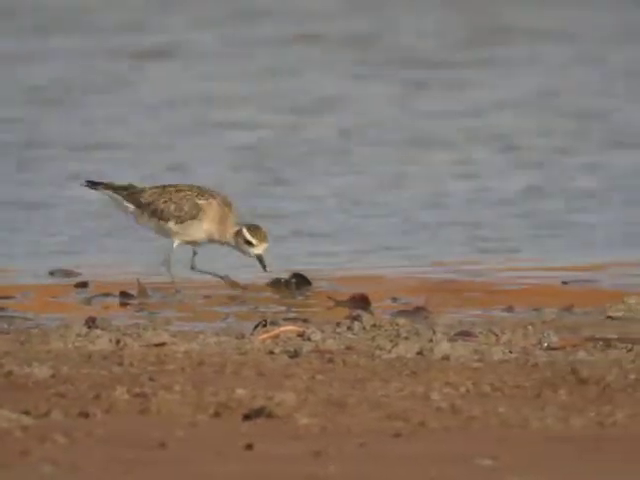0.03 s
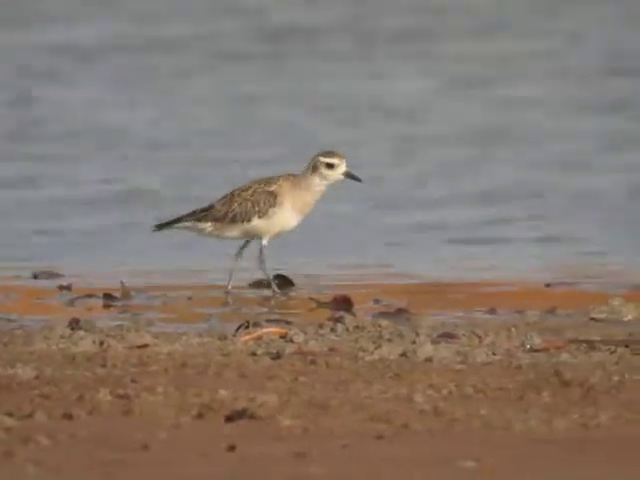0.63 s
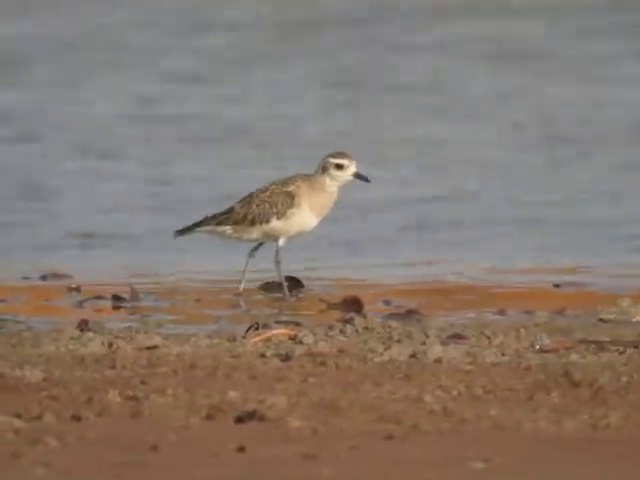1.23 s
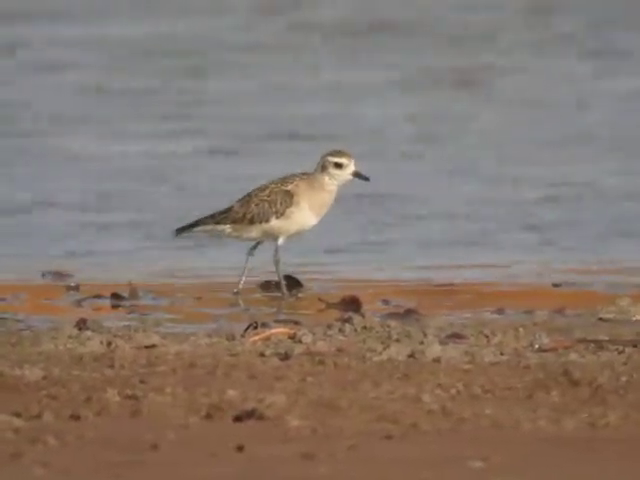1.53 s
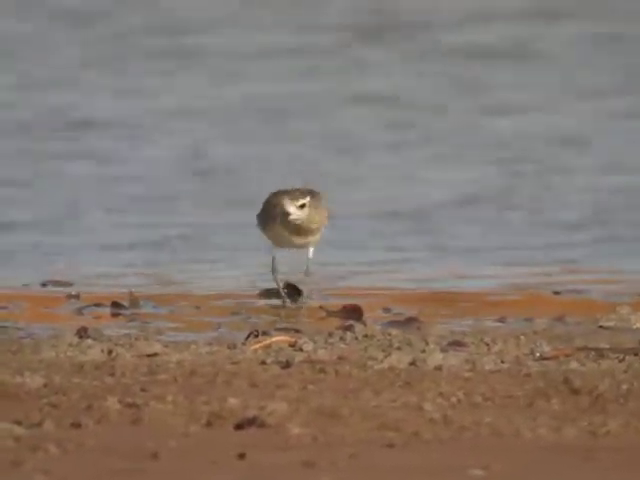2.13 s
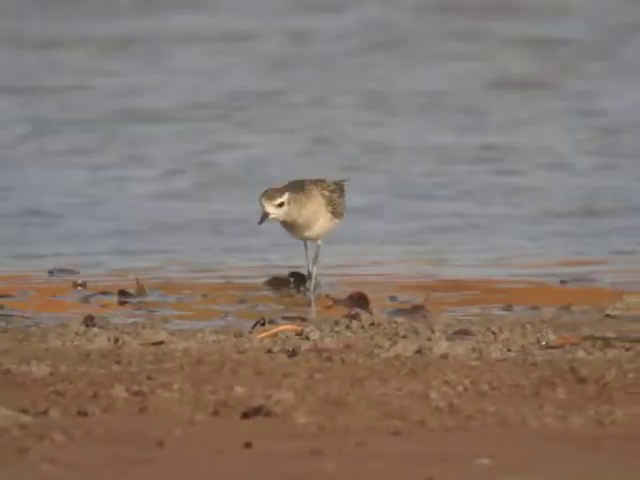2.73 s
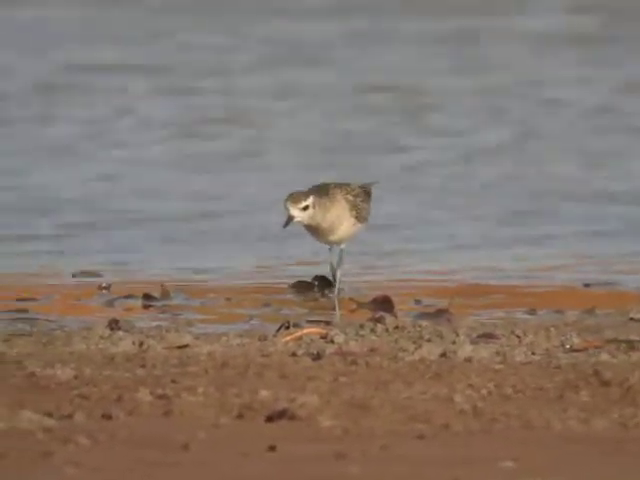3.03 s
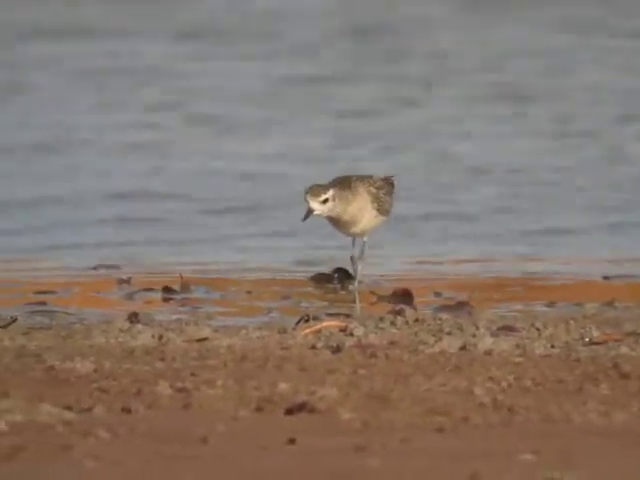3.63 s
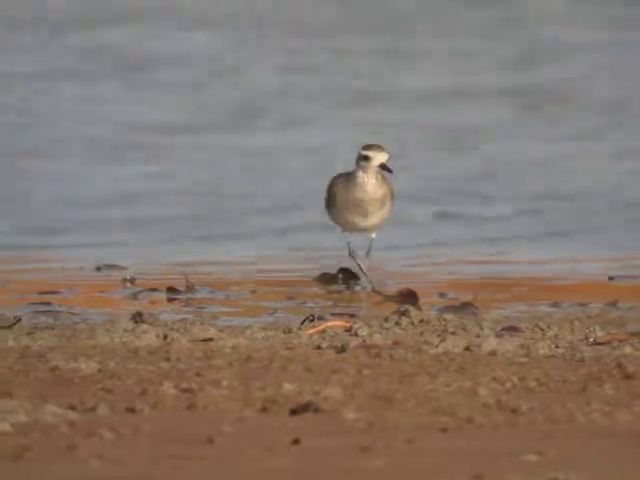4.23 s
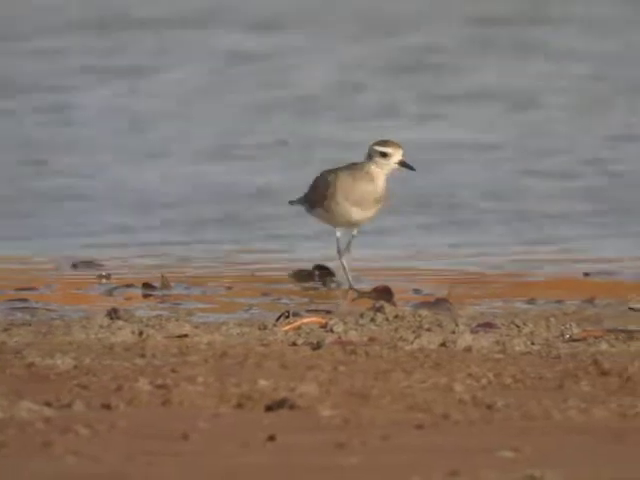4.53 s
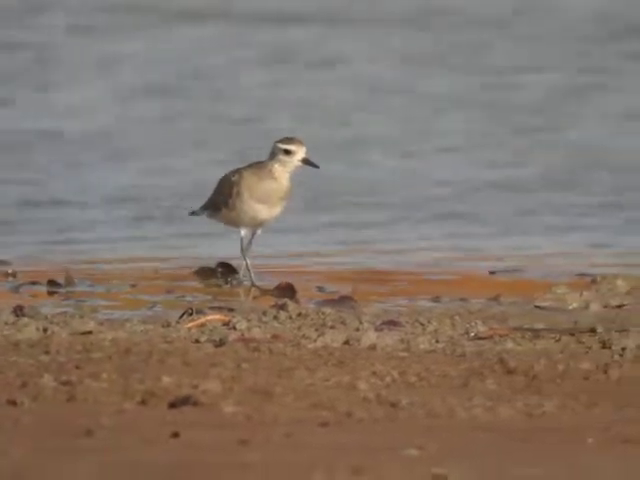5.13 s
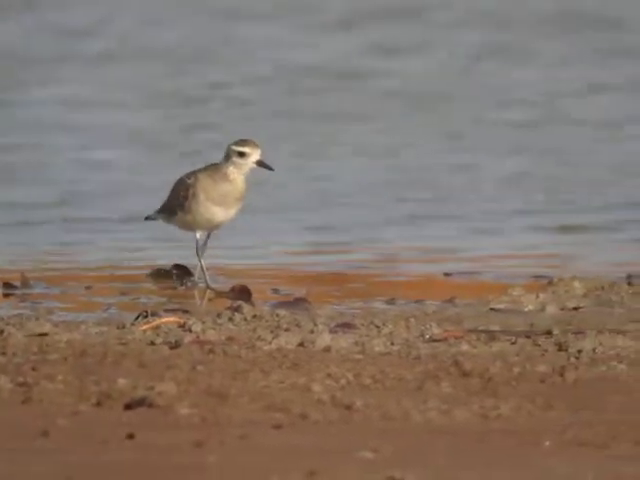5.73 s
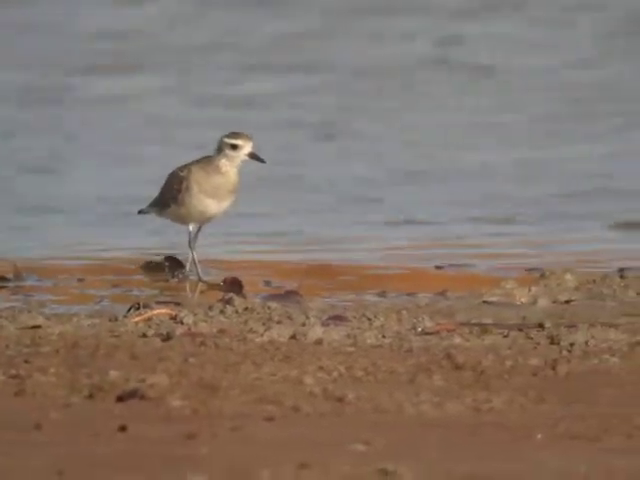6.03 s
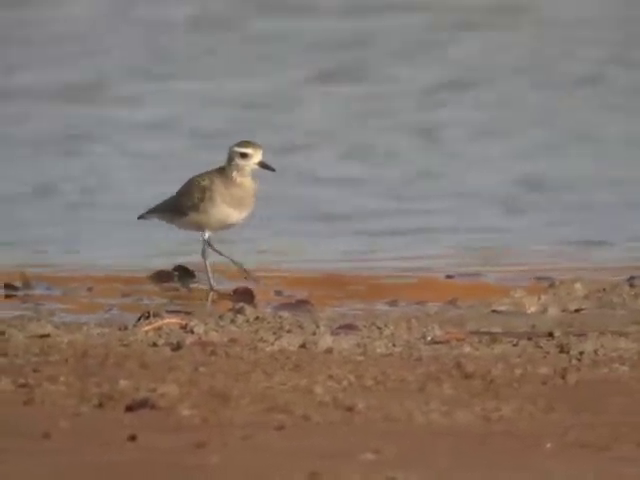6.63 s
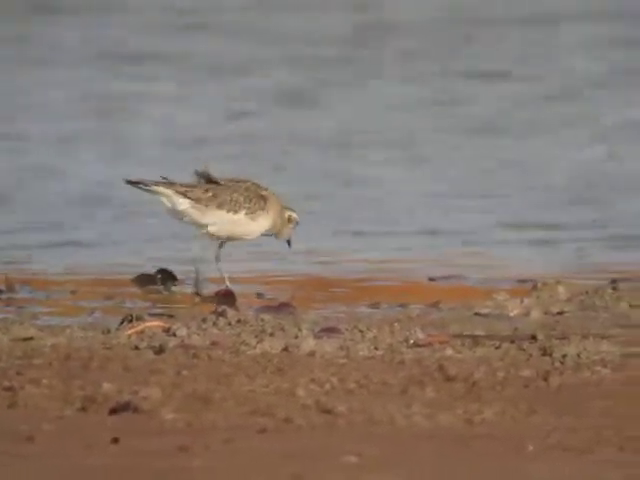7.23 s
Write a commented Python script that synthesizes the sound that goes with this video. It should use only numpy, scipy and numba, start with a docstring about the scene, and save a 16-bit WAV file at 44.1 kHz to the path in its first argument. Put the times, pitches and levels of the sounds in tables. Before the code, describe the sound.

Wind buffets the microphone on an open lake shore throughout, a deep, lumpy rumble with a rasping rush above it. Far behind, ripples merge into a very faint, even hiss. For the first three seconds the wind is fairly steady, with a couple of small pops near 0.3 seconds, a swell around 1.2 and a stronger puff at 2.7. From about 3.5 seconds the gusts turn rough and brighter, with sharp pops and crackles clustered between 3.5 and 4 and again near 4.9. Around 5.8 seconds the rush dips and a shorebird gives one very quiet, thin, short peep that rises slightly and leaves a faint echo. From 6 to 6.7 seconds comes a flurry of quick puffs, deep thumps and pops. A brighter rush follows, with one more pop at 7, easing slightly by 7.4 seconds.

```python
"""Wind buffets a camera microphone on an open lake shore, steady at first, over a faint hiss of ripples.
Large eddies rumble and small ones rasp at the port: the faster the air, the higher their noise reaches.
From about 3.5 s the gusts turn rough, and the hardest eddies pop on the port.
Near 5.8 s a shorebird peeps once, just ahead of a last flurry of puffs and pops."""
import sys
import numpy as np
from scipy import signal
from scipy.fft import rfft, irfft, next_fast_len
from scipy.io import wavfile
from scipy.ndimage import map_coordinates
from numba import njit

SR = 44100
rng = np.random.default_rng(int(sys.argv[2]) if len(sys.argv) > 2 else 0)


def to_wav(s):
    """Save 16-bit WAV."""
    ch = np.atleast_2d(s).T  # columns
    pcm = np.round(np.clip(ch, -1, 1) * 32767)  # PCM
    wavfile.write(sys.argv[1], SR, pcm.astype(np.int16))


N = 326340

# tone of the wind's deepest bass: frequency_hz, level_db
DEEP_SPECTRUM = [(8, -22.5), (18, -4), (28, 0.5), (48, -5.5), (70, -9.5), (110, -15), (300, -74),
                 (800, -120)]


def amp(db):
    """Decibels to gain."""
    return 10 ** (np.asarray(db) / 20)


def unit(x):
    """Scale to rms 1."""
    return x / np.sqrt(np.mean(x ** 2) + 1e-20)


def clock():
    """The time of each sample in seconds."""
    return np.arange(N) / SR


def curves(rows):
    """Automation lanes: one value per sample for each column after the time."""
    time_s, *columns = np.transpose(rows)
    return [np.interp(clock(), time_s, column) for column in columns]


def wobble(rate):
    """A smooth random curve of rms 1, rate knots a second."""
    knots = rng.standard_normal(N // 20)
    return unit(map_coordinates(knots, [clock() * rate], mode="wrap"))


def filtered(x, response):
    """Filter x by a gain given as a function of frequency in Hz."""
    size = next_fast_len(N + SR // 2)
    return irfft(rfft(x, size) * response(np.fft.rfftfreq(size, 1 / SR)), size)[:N]


def coloured(x, spectrum):
    """EQ x through (frequency_hz, level_db) points on a log axis."""
    points_hz, db = np.transpose(spectrum)
    return filtered(x, lambda hz: amp(np.interp(np.log(hz + 1), np.log(points_hz), db)))


@njit
def moving_lowpass(x, edge, damping, stages):
    """A chain of two-pole low-passes whose edge (cycles a sample) moves."""
    g = np.tan(np.pi * edge)
    y = x.copy()
    for _ in range(stages):
        a = b = 0.0
        for i in range(len(y)):
            band = (a + g[i] * (y[i] - b)) / (1 + g[i] * (g[i] + damping))
            y[i] = b + g[i] * band
            a, b = 2 * band - a, 2 * y[i] - b
    return y


def turbulence(puff_octaves, flutter_octaves, crackle_octaves, db_per_octave):
    """Small eddies rasp at the port: noise that gets brighter and louder as the air speeds up."""
    # the underlying wind, and the edge above which its eddies fade: time_s, level_db, edge_hz
    airflow = [(0, -36, 830), (.3, -26.5, 783), (.45, -32, 800), (.85, -29.5, 628), (1.17, -22, 1075),
               (1.65, -24.5, 1010), (2.12, -23.5, 1190), (2.6, -22.5, 865), (2.93, -28.5, 702),
               (3.12, -24, 784), (3.45, -28, 730), (3.56, -23.5, 1198), (3.92, -21, 1975),
               (4.05, -25, 1458), (4.42, -25, 920), (4.62, -26, 1300), (5.2, -28.5, 1280),
               (5.73, -28, 1183), (5.86, -34.5, 605), (6.62, -38, 656), (6.79, -24.5, 2000),
               (7.1, -27, 2110), (7.4, -29, 1064)]
    # tone of the microphone port: frequency_hz, gain_db
    port_eq = [(40, -22), (120, 2), (220, 3.5), (320, 3), (500, 1), (800, -1), (1300, -3.5), (2200, -6.5),
               (3200, -9.5), (5000, -11.5), (9000, -5.5)]
    level_db, edge_hz = curves(airflow)
    flutter = flutter_octaves * wobble(90)  # the flow is never even
    crackle = crackle_octaves * wobble(420)  # single eddies sweep past in a few ms
    # in fast air the eddies crowd together and merge into a more even rush
    unevenness = (edge_hz * 2 ** puff_octaves / np.median(edge_hz)) ** -0.5
    surge_octaves = puff_octaves + np.minimum(unevenness, 1) * (flutter + crackle)
    noise = rng.standard_normal(N) * np.sqrt(SR / 2000)  # unit power per kHz
    pressure = noise * amp(level_db - 0.5 + db_per_octave * surge_octaves)
    edge = np.clip(edge_hz * 2 ** surge_octaves / SR, 0, 1 / 4)
    return coloured(moving_lowpass(pressure, edge, damping=1.691, stages=3), port_eq)


def rumble(level_db, spectrum, lumps_db):
    """One band of low noise: large eddies push on the diaphragm in slow lumps."""
    noise = coloured(rng.standard_normal(N), spectrum)
    return amp(level_db) * unit(noise * amp(lumps_db * wobble(24)))


def buffeting(puff_db):
    """Large eddies round the camera body: a deep bed under a rumble that rides the puffs."""
    # strength of the large eddies: time_s, rumble_db, deep_db
    levels = [(0, -32.5, -28.5), (.3, -32, -27.5), (.6, -32, -34), (1.25, -25.5, -25), (2.1, -27.5, -25),
              (2.55, -32, -25.5), (2.8, -31, -24), (3.25, -24.5, -29.5), (3.5, -25, -25),
              (3.85, -27, -24.5), (4.05, -27.5, -31), (4.45, -21.5, -23), (4.7, -29, -25),
              (5.3, -24, -29.5), (5.5, -31, -22), (5.8, -27.5, -32.5), (5.95, -34.5, -16.5),
              (6.4, -28, -22), (6.95, -25, -30.5), (7.4, -36, -31.5)]
    # tone of the rumble: frequency_hz, level_db
    rumble_spectrum = [(25, -30), (55, -2), (80, 1), (110, -2), (160, -4.5), (230, -15), (400, -34),
                       (900, -84.5), (2000, -120)]
    rumble_db, deep_db = curves(levels)
    bed = rumble(deep_db, DEEP_SPECTRUM, lumps_db=0.3)
    return bed + rumble(rumble_db + puff_db, rumble_spectrum, lumps_db=2.22)


def water():
    """Countless far ripples merge into a soft, even hiss."""
    # slow swell of the hiss: time_s, level_db
    swell = [(0, -75.5), (.5, -74), (1.2, -70.5), (2.6, -70), (3.3, -68.5), (4, -72.5), (5, -74),
             (6.1, -73), (7.4, -78)]
    # tone of the ripples: frequency_hz, level_db
    ripple_spectrum = [(200, -3.5), (1500, 3), (3000, 2), (4500, -2.5), (7000, -3.5), (9000, -8),
                       (11000, -14.5), (15500, -23)]
    level_db, = curves(swell)
    return amp(level_db) * unit(coloured(rng.standard_normal(N), ripple_spectrum))


def puffs():
    """Puffs of air swell, hold and drop: two lanes, edge shift in octaves and rumble change in dB."""
    # puffs, or lulls where the shift is negative: middle_s, length_s, shift_octaves, rumble_change_db
    cues = [(0.09, 0.011, .5, -2), (.216, 0.0086, .5, 3), (0.295, .012, 0, 9), (0.334, 0.0076, 1.05, 0),
            (1.177, 0.019, .5, -5), (1.324, .04, 0.22, 4.5), (1.628, .05, 0.32, 1), (1.76, 0.017, 0.34, 4),
            (1.834, 0.031, 0.36, 6.5), (2.049, 0.034, .5, -1.5), (2.112, 0.029, 0.39, 2.5),
            (2.427, 0.023, 0.2449, 6), (2.5, 0.05, -0.18, 1.5), (2.736, 0.042, 0.88, 16.5),
            (2.837, 0.054, -0.5, -7), (3.052, 0.0088, .5, 0), (3.097, 0.071, .5, 1.5),
            (3.415, 0.047, .5, 3.5), (3.516, 0.058, 0.84, 6.5), (3.64, 0.014, .4, 2),
            (3.815, 0.051, 0.3845, 9), (3.892, .03, 0.42, -5), (3.963, 0.025, 0.3, -5),
            (4.104, .046, .35, -5), (4.146, .024, -0.95, -12), (4.21, .022, 0.51, 6.5),
            (4.24, .014, .5, -1), (4.261, .018, 0.15, -0.5), (4.442, 0.018, 0.56, 2),
            (4.516, 0.052, -0.64, -1), (4.556, 0.015, 0.6, 7), (4.674, .012, 0.44, -1.5),
            (4.886, 0.036, 0.79, 9), (4.943, .008, 1.04, -2), (5.134, .04, 0.52, 4.5),
            (5.377, .02, 0.56, -2), (5.406, 0.043, 0.56, -4), (5.552, 0.016, 0.65, -2.5),
            (5.932, .026, 1.21, -1.5), (5.993, .01, 0.96, 1.5), (6.034, 0.039, 1.9, 4),
            (6.074, 0.022, 1.5, 6), (6.113, .03, 1.28, 5), (6.152, .016, 1.31, -1), (6.176, 0.027, 1.64, 5),
            (6.201, 0.019, 2, -4), (6.224, 0.032, 1.39, 3), (6.281, 0.054, 0.7, 1), (6.33, .016, 1.32, -5),
            (6.366, 0.054, 1.43, 10.5), (6.406, 0.036, 2, 4), (6.435, .021, 2.5, 3),
            (6.453, 0.013, 1.85, -3), (6.496, .01, 1.29, 7.5), (6.52, 0.036, 1.5, 2),
            (6.548, 0.013, 1.5, -7), (6.596, .02, 1.62, 6), (6.644, 0.028, 1, 4), (6.677, 0.029, 1.04, 3.5),
            (6.821, 0.027, 0.26, 2.5), (6.928, 0.01, 0.28, -0.5), (7.114, 0.026, 0.34, 5.5)]
    lanes, t = np.zeros((2, N)), clock()
    for middle_s, length_s, shift_octaves, rumble_change_db in cues:
        envelope = np.exp(-(2 * (t - middle_s) / length_s) ** 4)
        lanes += np.outer((shift_octaves, rumble_change_db), envelope)
    return lanes


def suction(puff_octaves, gain_db):
    """The pressure at the port drops while a puff rushes past."""
    return -amp(gain_db) * coloured(puff_octaves, DEEP_SPECTRUM)


def pops(tick_s):
    """An eddy bursts right on the port: a rounded dip in pressure with a sharp tick at its bottom."""
    # bursting eddies: peak_s, thud_db, thud_half_width_s, tick_db
    bursts = [(.295, -11.5, 0.00059, -61), (.333, -20.5, 0.0003, -54), (3.053, -19.5, .0005, -53),
              (3.53, -5, .00031, -28), (3.639, -14.5, 0.00042, -46.5), (3.753, -23, 0.00065, -38),
              (3.787, -7, 0.00052, -23.5), (3.89, -18, 0.0002, -41), (3.948, -17, 0.00022, -46.5),
              (4.218, -18.5, 0.00023, -41), (4.548, -4, .0035, -69.5), (4.88, -6, .0006, -25.5),
              (4.887, -19.5, 0.00016, -39.5), (4.896, -9.5, 0.00066, -55), (4.944, -16.5, 0.00037, -32),
              (4.972, -10, 0.00078, -34.5), (5.557, -7.5, 0.0019, -60), (6.08, -13.5, 0.00097, -80),
              (6.413, -11, 0.00021, -51), (6.591, -7, 0.0019, -27.5), (6.668, -10, 0.00032, -46),
              (6.71, -6.5, 0.0018, -73), (7, -14.5, .0017, -28.5)]
    pressure, t = np.zeros(N), clock()
    for peak_s, thud_db, half_width_s, tick_db in bursts:
        since = t - round(peak_s * SR) / SR
        spread = (since / half_width_s) ** 2
        pressure -= amp(thud_db) * (1 - spread) / (1 + spread) ** 2
        pressure -= amp(tick_db) * np.exp(-np.abs(since) / tick_s)
    return pressure


def shorebird(peak_s, half_width_s, top_hz, level_db, echo_db, t60_s):
    """A thin whistle glides up as it swells and dies away, scattered back by the shore."""
    since = clock() - peak_s
    pitch_hz = top_hz - 60 * np.exp(np.minimum(-since / .011, 2))  # still 60 Hz flat at its loudest
    envelope = amp(level_db) * np.exp(-np.square(since / half_width_s))
    peep = envelope * np.sqrt(2) * np.sin(2 * np.pi * np.cumsum(pitch_hz) / SR)
    t = np.arange(SR // 2) / SR
    tail = rng.standard_normal(len(t)) * amp(-60 * t / t60_s)
    echo = signal.fftconvolve(peep, tail / np.linalg.norm(tail))[:N]
    return peep + amp(echo_db) * echo


def scene():
    """Wind right on the one microphone, with the quiet shore behind it."""
    puff_octaves, puff_db = puffs()
    mix = turbulence(puff_octaves, flutter_octaves=.15, crackle_octaves=0.22, db_per_octave=8)
    mix += buffeting(puff_db)
    mix += water()
    mix += suction(puff_octaves, gain_db=-21)
    mix += pops(tick_s=.00009)
    mix += shorebird(peak_s=5.785, half_width_s=0.013, top_hz=3000, level_db=-58.5,
                     echo_db=-8.5, t60_s=.42)
    return mix[None]


def record(dry):
    """The camera keeps nothing above its band limit."""
    return filtered(dry[0], lambda hz: hz < 15750)[None]


dry = scene()
out = record(dry)
to_wav(out)
```